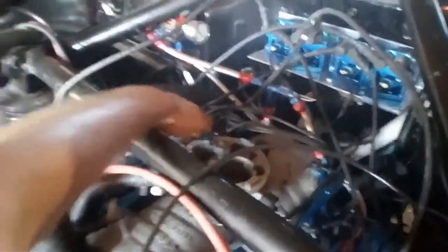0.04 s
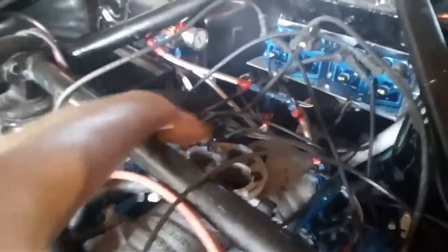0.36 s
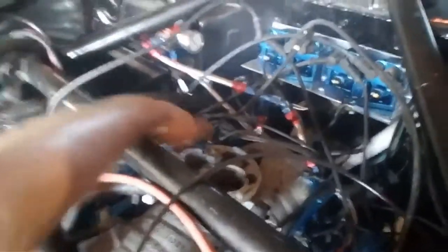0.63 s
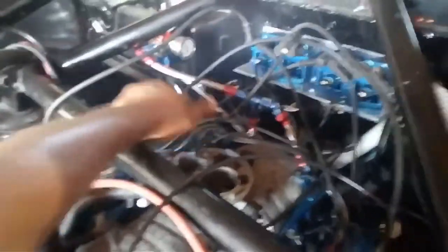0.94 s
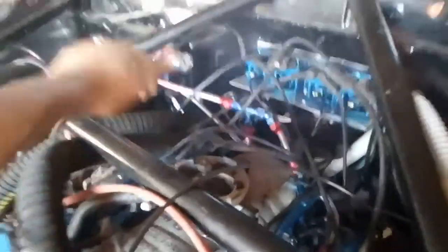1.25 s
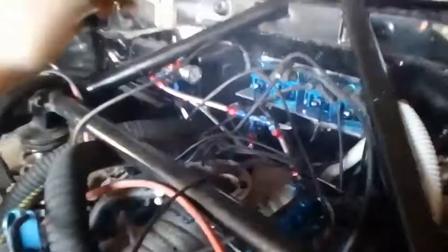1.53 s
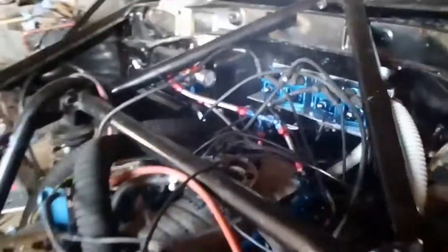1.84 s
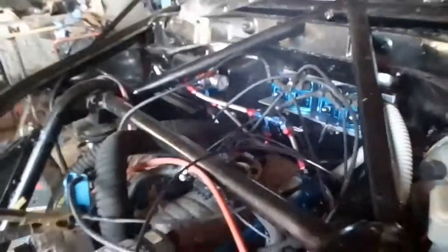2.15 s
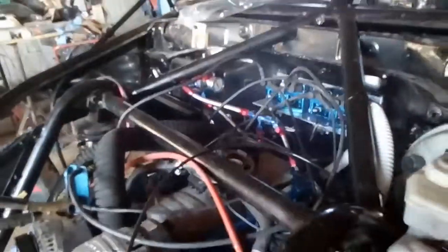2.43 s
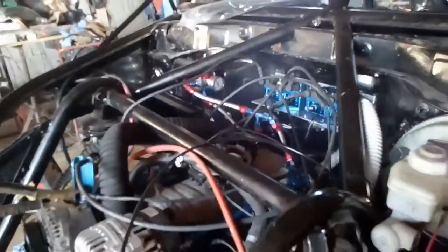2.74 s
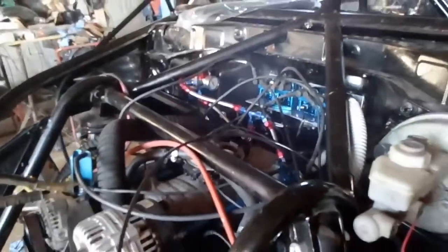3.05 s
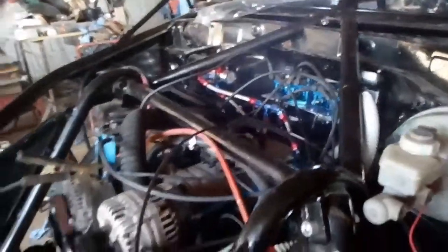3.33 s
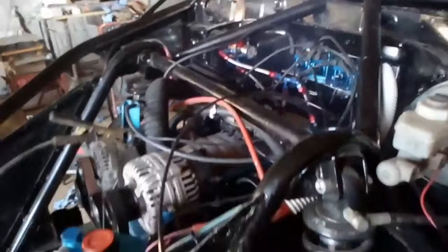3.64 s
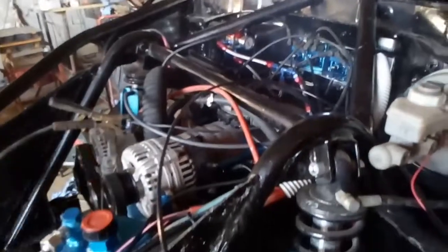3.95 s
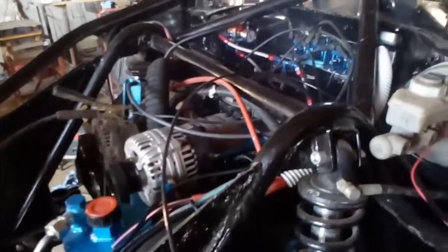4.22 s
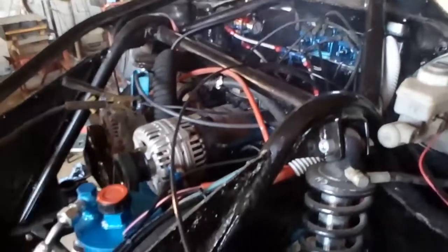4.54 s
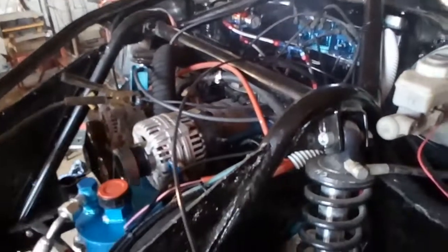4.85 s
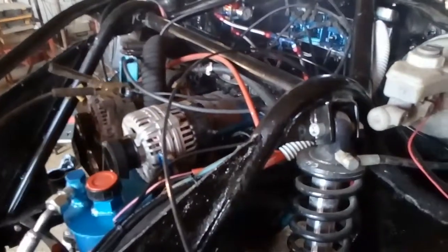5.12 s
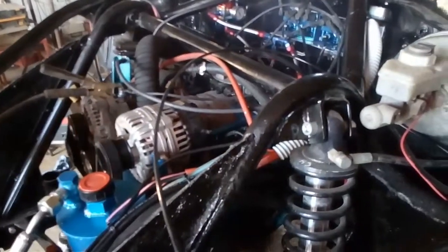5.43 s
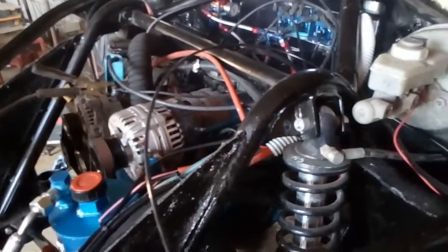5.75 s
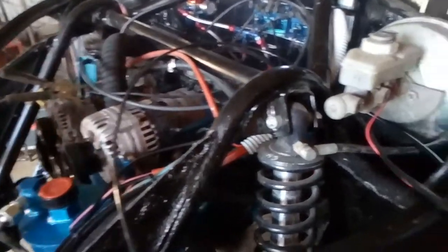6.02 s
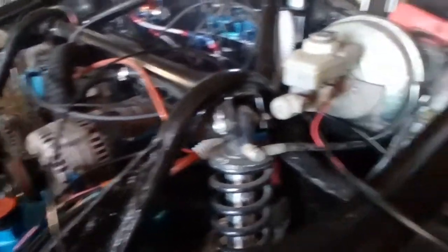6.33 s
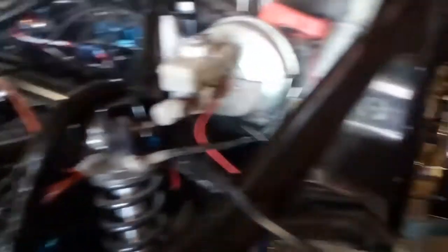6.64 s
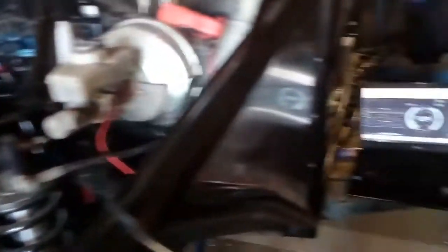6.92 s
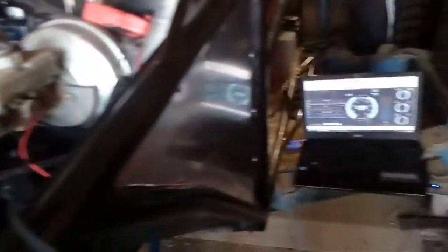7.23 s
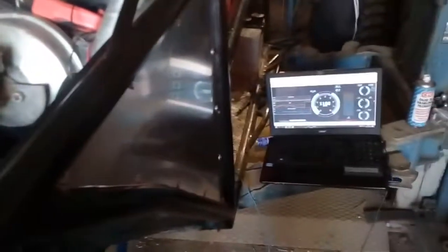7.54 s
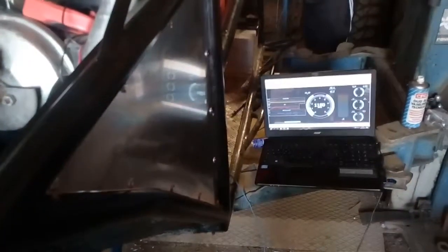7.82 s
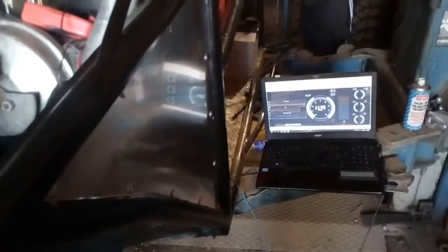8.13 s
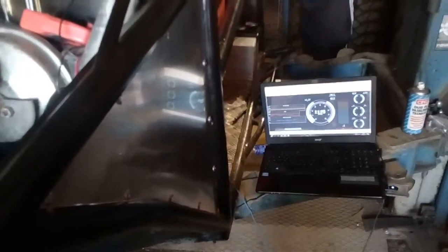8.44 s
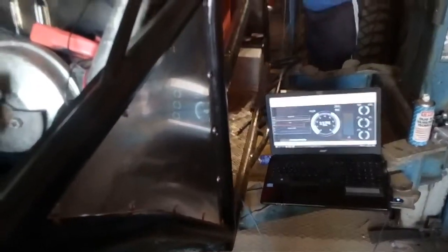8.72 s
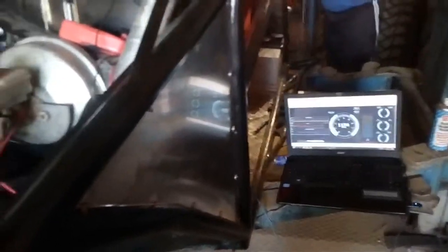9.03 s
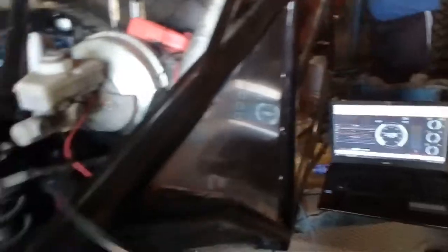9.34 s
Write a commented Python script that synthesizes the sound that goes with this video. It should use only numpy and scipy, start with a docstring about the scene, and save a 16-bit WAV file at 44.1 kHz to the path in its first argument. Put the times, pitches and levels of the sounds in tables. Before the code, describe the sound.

A petrol V8 is already running fast, heard close over an open engine bay in a workshop. It is blipped right at the start and again, harder, at about 0.5 seconds, with a sharp, falling swoosh of intake air and a loud roar. From 0.7 seconds the revs sink steadily: the exhaust drone swells and dips as it falls, and the belt whine drops and softens over valve clatter and hiss. Around 3 seconds the clatter changes colour as the stereo microphone reaches the front of the engine. By 4 seconds the engine settles into a quieter, lumpy, burbling idle with a low rumble. From 5.5 to 7.7 seconds the microphone moves round beside the cabin. Thin metal sizzles faintly near 6.3 seconds, then sheet metal rings and buzzes on and off with the firings from about 7 seconds. The idle continues to the end, near 9.5 seconds.

```python
"""A workshop, close over an open engine bay: a petrol V8 is blipped twice by hand at the throttle,
runs down and settles to a lumpy idle. Its firing orders sweep through the fixed resonances of the
exhaust; air hisses past the throttle plate, valve gear clatters and belt-driven parts whine.
The stereo microphone moves from the back of the engine to its front, then round to the cabin,
where thin metal sizzles and sings with the firings."""
import sys
import numpy as np
from scipy import signal
from scipy.fft import rfft, irfft
from scipy.io import wavfile
from scipy.ndimage import map_coordinates

SR = 44100
rng = np.random.default_rng(int(sys.argv[2]) if len(sys.argv) > 2 else 0)


def inscribe(sig):
    """Save sig as 16-bit PCM at rate SR to the path in sys.argv[1].

    A 1-D sig is mono; a 2-D sig holds one channel per row.
    Samples are clipped to [-1, 1] before scaling.
    """
    pcm = np.round(np.clip(np.atleast_2d(sig).T, -1, 1) * 32767)
    wavfile.write(sys.argv[1], SR, pcm.astype(np.int16))


N = 422478
TIME = np.arange(N) / SR
BINS = np.fft.rfftfreq(N, 1 / SR)
PIPE_GRID_HZ = np.arange(1400.)


def amp(db):
    """Decibels to gain."""
    return 10 ** (np.asarray(db) / 20)

def unit(x):
    """Scales to rms 1."""
    return x / np.sqrt(np.mean(x ** 2) + 1e-20)

def curve(rows):
    """A time table, at every sample."""
    return np.interp(TIME, *np.transpose(rows))

def read(points, hz=BINS):
    """A spectrum table on a log-frequency axis."""
    f, value = np.transpose(points)
    return np.interp(np.log(hz + 1), np.log(f + 1), value)

def tint(x, gain):
    """Filters by a gain for each frequency."""
    return irfft(rfft(x) * gain, N)

def peak(centre_hz, half_width_hz, hz=BINS):
    """The bell of one resonance, 1 at its centre."""
    return 1 / (1 + ((hz - centre_hz) / half_width_hz) ** 2)

def causal_phase(gain):
    """The phase lag that goes with a gain curve, so that it rings after a kick."""
    return -signal.hilbert(np.log(np.r_[gain, gain[-2:0:-1]])).imag[:len(gain)]

def drift(hz):
    """Slow random motion of rms 1."""
    return unit(map_coordinates(rng.standard_normal(4000), [TIME * hz * 2], order=1))

def ramp(start_s, end_s):
    """Rises from 0 to 1 between two times."""
    return np.clip((TIME - start_s) / (end_s - start_s), 0, 1)

def bumps(rows):
    """Smooth short swells and dips of level, in dB."""
    return sum(db * np.exp(-((TIME - s) / half) ** 2) for s, half, db in rows)

def resonate(x, hz, width_hz):
    """A resonance of gain 1 whose centre follows the curve hz."""
    turn = np.exp(2j * np.pi * np.cumsum(hz) / SR)
    pole = np.exp(-np.pi * width_hz / SR)
    return 2 * (turn * signal.lfilter([1 - pole], [1, -pole], x / turn)).real

# Stereo width at the microphone: pitch_hz, side_minus_mid_db
STEREO_WIDTH = [(60, -26), (110, -5.5), (200, -8), (380, -10), (700, -8.5), (1290, 0), (2380, 0),
                (4400, 0.5), (8120, -2.5), (15000, 1.5)]

def pair_noise():
    """Noise spectra at two microphone ports: alike in the bass, parted in the treble by bay echoes."""
    mid, side = rfft(rng.standard_normal((2, N)))
    echoes = rfft(rng.standard_normal(N) * np.exp(-TIME / 0.0018))
    side = .75 * side + .66 * mid * echoes / np.sqrt(np.mean(abs(echoes) ** 2))
    width = amp(read(STEREO_WIDTH))
    return np.array([mid + width * side, mid - width * side]) / np.sqrt(1 + width ** 2)

# Two blips, a run-down, a slight undershoot, idle: time_s, cycle_rate_hz
ENGINE_SPEED = [(0, 30.6), (.18, 34.6), (.46, 31.8), (.69, 37.2), (1.2, 31.7), (1.8, 26.1), (2.2, 22.6),
                (2.6, 19.05), (3.0, 15.3), (3.4, 12.66), (3.8, 10.3), (4.05, 9.65), (4.3, 9.67),
                (4.75, 9.96), (5.3, 9.77), (5.68, 9.95), (6.35, 9.77), (7.65, 9.89), (8.1, 9.74),
                (9.58, 9.9)]

def crankshaft(idle):
    """Rate and running count of four-stroke cycles; uneven idle firings nudge the crank to and fro."""
    speed = curve(ENGINE_SPEED)
    return speed, np.cumsum(speed) / SR + .0025 * idle * drift(4)

def high_revs(speed, span_hz=(23.7, 29.5)):
    """0 at low revs, 1 at high revs."""
    return np.interp(speed, span_hz, [0, 1])

# The eight uneven cylinders in firing order: strength_db
CYLINDER_STRENGTHS = [1, 6.5, 5.5, 6.5, 10.5, 9, -21, 7]

def firing_gate(cycles, decay_gaps=0.98):
    """A puff at each firing, a little early or late, fading across the gap to the next."""
    firings = np.abs(cycles * len(CYLINDER_STRENGTHS) + .3 * drift(30))
    index = firings.astype(int)
    count = index.max() + 1
    size = amp(np.resize(CYLINDER_STRENGTHS, count) + 2 * rng.standard_normal(2000)[:count])
    return unit(size[index] * np.exp(-(firings % 1) / decay_gaps))

# The hand on the throttle: open_s, shut_s, opening_fraction
THROTTLE_BLIPS = [(-.06, 0.14, 0.65), (0.43, 0.633, 0.99)]

def engine_load(lag_s=0.032, fill_s=0.061, empty_s=0.077):
    """Load 0-1: the cylinders fill a moment after the plate opens and empty after it shuts."""
    load = 0
    for opens, shuts, size in THROTTLE_BLIPS:
        filling = ramp(opens + lag_s, opens + lag_s + fill_s)
        load += size * filling * np.exp(-np.maximum(TIME - shuts, 0) / empty_s)
    return np.clip(load, 0, 1)

# Intake gulp and the roar under load, from the back of the engine: pitch_hz, gain_db
GULP_SPECTRUM = [(350, -42), (600, -12), (890, -31.5), (1170, 2), (1340, -3), (2270, 3.5), (3030, -5),
                 (3240, 2), (5140, 6), (6390, 3), (8160, -19.5), (15500, -23)]
ROAR_SPECTRUM = [(100, -38), (215, -9), (270, 10.5), (380, 4.5), (500, -31), (800, -6), (1100, -10),
                 (3000, -42), (6600, -70)]

def throttle(cycles, load, gulp_db=-9, rise_s=0.016, fall_db_per_s=113, roar_db=-12):
    """Air rushes past the opening plate and dies as the manifold fills; then the cylinders fire hard."""
    rush = 0
    for opens, _, size in THROTTLE_BLIPS:
        fall_db = fall_db_per_s * np.maximum(TIME - opens - rise_s, 0)
        rush += size * ramp(opens, opens + rise_s) * amp(gulp_db - fall_db)
    gulp = unit(irfft(pair_noise() * amp(read(GULP_SPECTRUM)), N))
    puffs = irfft(pair_noise(), N) * firing_gate(cycles)
    roar = unit(tint(puffs, amp(read(ROAR_SPECTRUM))))
    return gulp * rush + roar * load * amp(roar_db)

# Exhaust resonances: pitch_hz, half_width_hz, gain_db, cabin_change_db
PIPE_MODES = [(47.5, 7.4, -15, 4.5), (70.2, 2.3, -8.5, -6), (81.3, 3.95, -8, -5), (102.9, 9.7, 1, -4),
              (121.4, 4.4, -11.5, 6), (135.9, 7.64, 2, 2), (153.5, 9.8, -11.5, -1.5),
              (177.3, 5.5, -8, 10.5), (195.3, 7.5, -8, 3.5), (226, 21.2, -7, 2.5), (299.6, 12.5, -3.5, -3),
              (361, 42, -15, 3.5), (425, 25, -13.5, -8)]

def pipe_gain(hz, cabin, leak=0.0047):
    """Gain of the exhaust system; cabin is 0 with the microphone over the engine, 1 beside the cabin."""
    power = sum(amp(db + cabin * change) ** 2 * peak(f, w, hz) ** 2 for f, w, db, change in PIPE_MODES)
    return np.sqrt(leak + power)

# Exhaust pulsation above idle, ahead of the pipe: cycle_multiple, level_db
RUNNING_ORDERS = [(2, -14), (3, -11.5), (4, -13), (5, -13), (6, -14.5), (7, -21), (8, -13.5), (9, -21),
                  (10, -22), (11, -23.5), (12, -24), (13, -23.5), (14, -23.5), (15, -24), (16, -20),
                  (17, -26.5), (18, -27.5), (19, -22.5), (20, -30.5), (21, -22.5), (22, -32), (23, -27),
                  (24, -25.5)]
# Change of the lowest orders, from 2 upward: coasting_db, labouring_db, full_load_db
LOW_ORDER_SHIFTS = [(-8, 1, 0), (-0.5, -1, -2), (-8.5, -11, -9), (0, -3, -7), (8.5, -5, -13), (12, -9, -5),
                    (3, 5, -2), (-3, -0.5, 9)]
# Workshop echoes cancel or reinforce the exhaust behind the engine: pitch_hz, half_width_hz, gain_db
WORKSHOP_ECHOES = [(63, 2, -7), (67, 2.5, 3.5), (72.8, 1.9, -21), (76.2, 2.3, 7.5), (88, 1.3, -2),
                   (111.6, 1.8, -17), (116, 3.1, 3.5), (127.3, 3.1, -10.5), (138, 4.4, -4), (162, 3.1, -10),
                   (172, 5.6, 0), (182, 1.1, -19), (210.2, 4.1, -14.5), (223, 9.3, 2), (236.7, 1.5, 0.5),
                   (259, 3.2, -9), (446, 20, 4)]

def exhaust_drone(cycles, speed, idle, front, cabin, load, bark_db=7, snarl_db=3.5, boom_top_hz=206):
    """Engine orders swell as they cross the pipe's resonances and break up in the workshop's echoes."""
    grid = PIPE_GRID_HZ
    at_engine, at_cabin = pipe_gain(grid, 0), pipe_gain(grid, 0.82)
    echo_db = sum(db * np.exp(-((grid - f) / w) ** 2) for f, w, db in WORKSHOP_ECHOES)
    echo_phase = causal_phase(amp(echo_db))
    echo_share = (1 - .8 * front) * (1 - idle)  # mostly gone at the front of the engine
    coasting = high_revs(speed) * (1 - load)
    labouring = np.interp(speed, [18, 19.8], [1, 0])
    shifts, out = dict(enumerate(LOW_ORDER_SHIFTS, 2)), np.zeros(N)
    for order, db in RUNNING_ORDERS:
        hz = order * speed
        pipe = (1 - cabin) * np.interp(hz, grid, at_engine) + cabin * np.interp(hz, grid, at_cabin)
        room = amp(echo_share * np.interp(hz, grid, echo_db))
        if order in shifts:
            coast_db, labour_db, load_db = shifts[order]
            boom = 1 / (1 + (hz / boom_top_hz) ** 40)
            strength = amp(db + coast_db * coasting * boom + labour_db * labouring + load_db * load)
        else:
            strength = amp(db + bark_db * load + snarl_db * coasting)
        sway = 1 + .16 * drift(3.5)
        arrival = .4 + .015 * order  # higher orders leave the pipe later in the cycle
        phase = 2 * np.pi * (order * (cycles - arrival) + .24 * rng.standard_normal())
        phase += echo_share * np.interp(hz, grid, echo_phase)
        out += pipe * room * strength * sway * np.cos(phase)
    return out * (1 - idle)

def exhaust_thumps(cycles, speed, idle, cabin, load, top_hz=320):
    """Firings come out strong or weak by chance, more evenly at high revs; each thumps the pipe."""
    firings = np.flatnonzero(np.diff(np.floor(8 * cycles)))
    burn = np.tanh(rng.standard_normal(len(firings)))  # between a misfire and a full burn
    kicks = np.zeros(N)
    kicks[firings] = burn / np.sqrt(np.gradient(firings))
    band = (BINS + 1) / (BINS + 12) / np.sqrt(1 + (BINS / top_hz) ** 4)
    out = 0
    for place, share in enumerate([1 - cabin, cabin]):
        gain = pipe_gain(BINS, place) * band
        out += share * unit(tint(kicks, gain * np.exp(1j * causal_phase(gain))))
    return out * amp(-26 + 4 * idle - 5 * high_revs(speed) + 4.4 * load)

# Clatter and hiss: idle_db, speed_doubling_db, high_revs_change_db, load_change_db, cabin_change_db
CLATTER_GROWTH = (-29, 4, -0.1, 7.5, 0)
HISS_GROWTH = (-28.5, 0.6, 4.5, 4.5, -1.1)
# Brief swells and dips of both: centre_s, half_length_s, change_db
NOISE_SURGES = [(1.75, 0.14, 1.5), (2.33, 0.091, 1.5), (2.43, 0.05, -3), (2.65, 0.043, 1.5),
                (2.88, 0.1, -2), (3.04, 0.11, 1.5), (3.32, 0.066, 1), (3.5, 0.042, -2.5), (3.9, .15, 1),
                (6.8, 0.076, -2), (9.32, 0.034, -2.5)]

def mechanical_levels(speed, load, cabin, idle_hz=9.8):
    """Levels of clatter and hiss in dB: both grow with speed and load, and waver together."""
    waver_db = bumps(NOISE_SURGES) + 0.67 * drift(7)
    doublings, revs = np.log2(speed / idle_hz), high_revs(speed)
    return [idle_db + doubling_db * doublings + revs_db * revs + load_db * load + cabin_db * cabin
            + waver_db
            for idle_db, doubling_db, revs_db, load_db, cabin_db in (CLATTER_GROWTH, HISS_GROWTH)]

def bay_ripple(spacing_hz=45):
    """Reflections in the bay ripple the spectrum, differently at each microphone position, in dB."""
    ripple = map_coordinates(rng.standard_normal(4000), [BINS / spacing_hz], order=1)
    return 1.1 * ripple * np.clip(BINS / 2000, 0, 1)

# Mechanical noise from behind the engine, at its front and beside the cabin: pitch_hz, gain_db
REAR_SPECTRUM = [(260, -6.5), (450, -0.5), (554, -7.5), (596, -5.5), (876, -8.5), (1030, -4.5),
                 (1130, -7.5), (1730, -4), (3170, -17), (3740, -18.5), (5170, -18), (6460, -22.5),
                 (8190, -47), (12200, -43), (15500, -50)]
FRONT_SPECTRUM = [(260, -65), (450, -3.5), (614, -9.5), (838, -6.5), (1120, -6.5), (1350, -8.5),
                  (1780, -2.5), (2330, -11.5), (2540, -9.5), (3850, -13.5), (4210, -10.5), (4600, -16.5),
                  (6270, -2), (7950, -36.5), (13700, -29), (15500, -42)]
CABIN_SPECTRUM = [(260, -39), (450, -25), (477, 0.5), (570, -7), (767, -11.5), (902, -10), (1130, -6.5),
                  (1350, -9), (1560, -5.5), (1950, -4), (2430, -10), (3700, -13), (4950, -16.5),
                  (5330, -13.5), (6000, -14), (8070, -37.5), (11500, -33.5), (15500, -39)]
# Its balance over the engine and beside the cabin: pitch_hz, left_minus_right_db
ENGINE_BALANCE = [(60, 5), (110, 12), (200, 16), (380, -6), (700, -3.5), (1290, 2.5), (2380, 1), (4400, -6),
                  (8120, -1.5), (15000, 4.5)]
CABIN_BALANCE = [(60, -1.0), (110, -1.0), (200, 0.5), (380, -2), (700, -4.5), (1290, 2), (2380, 2.5),
                 (4400, -11), (8120, 0), (15000, 0)]
# Ringing covers and brackets: pitch_hz, half_width_hz, front_db, cabin_db
COVER_MODES = [(765, 30, 1, 10.5), (1654, 52, 3, 2), (2000, 53, -2.5, 5), (2203, 23, 7, 7),
               (3347, 14, 8, 8), (4280, 70, 3, 3.5), (4500, 56, 4, 8), (4845, 78, 6, 9),
               (5600, 170, 2.5, -1.5), (6070, 340, -6.5, 1.5), (9240, 1700, -7.5, -4.5)]

def valve_clatter(cycles, front, cabin, clatter_db, hiss_db, split_hz=2750):
    """Valve gear and belts rattle the covers with the firings; the colour follows the microphone."""
    noise, low = pair_noise(), 1 / (1 + (BINS / split_hz) ** 8)
    front_ring_db = sum(db * peak(f, w) for f, w, db, _ in COVER_MODES)
    cabin_ring_db = sum(db * peak(f, w) for f, w, _, db in COVER_MODES)
    positions = [(REAR_SPECTRUM, 0.17 * front_ring_db, ENGINE_BALANCE, 1 - front),
                 (FRONT_SPECTRUM, front_ring_db, ENGINE_BALANCE, front - cabin),
                 (CABIN_SPECTRUM, cabin_ring_db, CABIN_BALANCE, cabin)]
    clatter, hiss = 0, 0
    for colour, ring_db, balance, share in positions:
        pan_db = np.outer([.5, -.5], read(balance))
        spectrum = noise * amp(read(colour) + ring_db + bay_ripple() + pan_db)
        clatter += share * unit(irfft(spectrum * low, N))
        hiss += share * unit(irfft(spectrum * (1 - low), N))
    gate = firing_gate(cycles)
    clatter *= unit(.86 + .14 * gate) * amp(clatter_db)
    hiss *= unit(.85 + .15 * gate) * amp(hiss_db)
    return clatter + hiss

# Tones of the belt-driven parts: cycle_multiple, relative_db
BELT_TONES = [(17.8, -14), (18.7, -10.5), (23.75, -10.5), (29.7, -20), (35.6, -13), (44.7, -17),
              (47.5, -18), (59.4, -17), (64.6, -19), (71.1, -12.5), (79.8, -20), (89.7, -16),
              (106.8, -13.5), (119.7, -22), (149.4, -12.5), (178, -22), (179.6, -14), (209.5, -25)]
# How well the engine radiates them: pitch_hz, gain_db
BELT_RADIATION = [(600, -5.5), (1150, -2), (1500, -5), (2150, 2), (2400, -4), (3100, -.5), (3400, -6),
                  (4150, -7), (4500, 1.5), (4850, -1), (5000, 4), (5300, 8), (5450, 5), (5600, -1),
                  (6000, -3), (7500, -12)]

def belt_whine(cycles, speed, load, hiss_db, slow_db=-8, flicker_db=3.5, slip_cycles=0.001):
    """Alternator and pump tones fade as the revs drop; slip blurs them, echoes vary them at each port."""
    shaft = cycles + slip_cycles * drift(18)
    out = np.zeros((2, N))
    for multiple, db in BELT_TONES:
        radiated_db = db + read(BELT_RADIATION, multiple * speed)
        turns = multiple * shaft + rng.random()
        for port in out:
            gain = amp(radiated_db + flicker_db * drift(9))
            port += gain * np.sin(2 * np.pi * turns + 2 * rng.random())
    slowness = np.interp(speed, [15, 27], [1, 0])
    load_duck_db = -15 * np.sqrt(load)  # the whine recedes under the roar of the blips
    return out * amp(hiss_db + 2.5 + slowness * slow_db + load_duck_db)

def rumble(speed, level_db=-25, high_revs_db=-20):
    """Low flutter of air and bodywork, with the workshop's diffuse boom; it dies away at high revs."""
    # pitch_hz, gain_db
    colour = [(5, -9), (20, -10), (35, -18), (60, 6.5), (150, 1), (350, -5), (500, -14.5),
              (900, -34), (3000, -78)]
    noise = unit(irfft(pair_noise() * amp(read(colour)), N))
    return noise * amp(level_db + high_revs_db * high_revs(speed))

# The deepest exhaust notes briefly sag: centre_s, half_length_s, change_db
BASS_DIPS = [(.2, 0.038, -6), (.43, 0.045, -16), (1.17, 0.039, -11), (2.42, 0.019, -3.5), (2.64, .03, -3),
             (3.33, 0.046, -7.5), (3.54, 0.027, -7), (4.1, .025, -6), (4.3, 0.03, -4), (4.73, .025, -8),
             (6.85, 0.03, -4), (7.7, 0.046, -3.5)]
# Hard and soft bunches of firings in the upper exhaust note: centre_s, change_db
BARK_THROBS = [(2.09, 1.5), (2.69, 2), (2.87, -5), (3.47, -9), (3.72, 4.5), (3.9, -3), (3.99, -4),
               (4.17, 2.5), (4.41, 4.5), (4.7, 2.5), (5.72, 3), (6.53, 3), (6.94, 1.5), (7.76, 3),
               (7.971, 3), (8.48, 3), (8.67, 3), (8.89, 2.5), (9.28, 1.5), (9.49, 0.5)]

def lope(x, cycles, idle, split_hz=180, throb_half_s=0.039):
    """Brief dips lower the bass, hard firings lift the bark; at idle the two take turns once a cycle."""
    bass = tint(x, 1 / (1 + (BINS / split_hz) ** 12))
    bass_swell = 1 + .18 * idle * np.cos(2 * np.pi * (cycles - .68))  # late in the cycle
    bark_swell = 1 + .22 * idle * np.cos(2 * np.pi * (cycles - .12))  # early in the next
    throbs_db = bumps([(s, throb_half_s, db) for s, db in BARK_THROBS])
    return bass * bass_swell * amp(bumps(BASS_DIPS)) + (x - bass) * bark_swell * amp(throbs_db)

def plate_swoosh(from_hz=6340, to_hz=700, glide_s=0.045, width_hz=1700, fall_db_per_s=60):
    """The hiss of the main blip sinks in pitch as the gap at the throttle plate widens."""
    opens = THROTTLE_BLIPS[-1][0]
    age = np.maximum(TIME - opens, 0)
    hz = to_hz + (from_hz - to_hz) / (1 + (age / glide_s) ** 3)
    air = irfft(pair_noise(), N)
    air = resonate(resonate(air, hz, width_hz), hz, width_hz)
    band = 1 / (1 + (BINS / 7000) ** 16) / (1 + (500 / (BINS + 1)) ** 4)
    return unit(tint(air, band)) * ramp(opens, opens + 0.016) * amp(-12 - fall_db_per_s * age)

# Idle exhaust pulsation (half multiples repeat every second cycle): cycle_multiple, front_db, cabin_db
BURBLE_ORDERS = [(2, -16, -20), (3, -18, -24), (4, -19, -23), (4.5, -23, -22), (5, -14, -16), (6, -18, -24),
                 (7, -18, -14), (8, -11, -12), (9, -18, -25), (10, -26, -27), (10.5, -27, -28),
                 (11, -25, -24), (12, -21, -28), (13, -40, -29), (13.5, -34, -33), (14, -23, -27),
                 (14.5, -34, -38), (15, -28, -34), (16, -18, -13), (17, -17, -21), (18, -31, -36),
                 (19, -27, -26), (21, -25, -22), (22, -32, -38), (23, -31, -30), (24, -25, -19),
                 (25, -22, -23), (26, -30, -34), (28, -35, -22), (29, -30, -25), (30, -42, -39),
                 (31, -30, -36), (32, -34, -36), (33, -40, -28), (34, -28, -45), (37, -35, -38),
                 (38, -38, -44), (40, -46, -35), (45, -32, -37), (46, -31, -39), (49, -28, -29),
                 (50, -30, -29)]

def idle_burble(cycles, speed, cabin, sway=.2, trim_db=0.7):
    """The idle's orders glide into the resonances of the pipe, each swaying a little by itself."""
    at_engine, at_cabin = pipe_gain(PIPE_GRID_HZ, 0), pipe_gain(PIPE_GRID_HZ, 0.8)
    out = np.zeros(N)
    for order, front_db, cabin_db in BURBLE_ORDERS:
        gain = (1 - cabin) * amp(front_db) * np.interp(order * speed, PIPE_GRID_HZ, at_engine)
        gain += cabin * amp(cabin_db) * np.interp(order * speed, PIPE_GRID_HZ, at_cabin)
        out += gain * (1 + sway * drift(3)) * np.cos(2 * np.pi * (order * cycles + rng.random()))
    return out * ramp(3.38, 3.92) * amp(trim_db)

# A thin sizzling part and singing sheet metal on the cabin side: pitch_hz, half_width_hz, gain_db
SIZZLE_MODES = [(4330, 90, -2), (4540, 60, -2), (4900, 100, 3)]
SHEET_MODES = [(1910, 45, 5), (2014, 35, 0), (2210, 30, -7)]
# Each of them as the microphone passes close by: time_s, level_db
SIZZLE_PASS = [(5.9, -62), (6.2, -37), (6.35, -36), (6.5, -42), (6.7, -60), (7.2, -58), (7.4, -42),
               (8.0, -41), (8.6, -49), (9.1, -43), (9.5, -52)]
SHEET_PASS = [(6.3, -65), (6.78, -52), (6.88, -36), (7.01, -36), (7.1, -57), (7.55, -48), (7.72, -35),
              (8.1, -35), (8.35, -48), (8.65, -38), (9.05, -34), (9.35, -52)]

def metal_ring(cycles, modes, levels):
    """The firings shake a metal part, heard only when the microphone is close to it."""
    response = sum(amp(db) * peak(f, w) for f, w, db in modes)
    shaking = irfft(pair_noise(), N) * firing_gate(cycles, decay_gaps=0.99)
    return unit(tint(shaking, response)) * amp(curve(levels))

def exhaust_at_microphone(exhaust, cabin):
    """The left port hears the exhaust weaker and later; level and lag grow beside the cabin."""
    right = exhaust * amp(2.5 + cabin)
    lag_s = .00012 + .00022 * cabin
    return np.array([amp(-.4) * np.interp(TIME - lag_s, TIME, right), right])

def scene():
    """Everything turns with the crankshaft while the microphone is carried round the engine."""
    idle, load = ramp(3.49, 4.03), engine_load()
    speed, cycles = crankshaft(idle)
    front = ramp(2.4, 3.4)  # microphone from the back of the engine to its front
    cabin = ramp(5.5, 7.7) - 0.28 * ramp(9.13, 9.17)  # on to the cabin, then a little way back
    thumps = exhaust_thumps(cycles, speed, idle, cabin, load)
    orders = exhaust_drone(cycles, speed, idle, front, cabin, load) + idle_burble(cycles, speed, cabin)
    exhaust = exhaust_at_microphone(lope(orders + thumps, cycles, idle), cabin)
    clatter_db, hiss_db = mechanical_levels(speed, load, cabin)
    belt = belt_whine(cycles, speed, load, hiss_db)
    valves = valve_clatter(cycles, front, cabin, clatter_db, hiss_db)
    metal = metal_ring(cycles, SHEET_MODES, SHEET_PASS) + metal_ring(cycles, SIZZLE_MODES, SIZZLE_PASS)
    intake = throttle(cycles, load) + plate_swoosh()
    return exhaust + belt + valves + metal + intake + lope(rumble(speed), cycles, idle)

def record(dry, top_hz=15600):
    """The recorder rounds off peaks near full scale and cuts the highest treble."""
    limited = dry / (1 + dry ** 8) ** (1 / 8)
    lowpass = signal.firwin(511, top_hz, window=("kaiser", 9), fs=SR)
    return signal.oaconvolve(limited, lowpass[None], "same")


dry = scene()
out = record(dry)
inscribe(out)
```